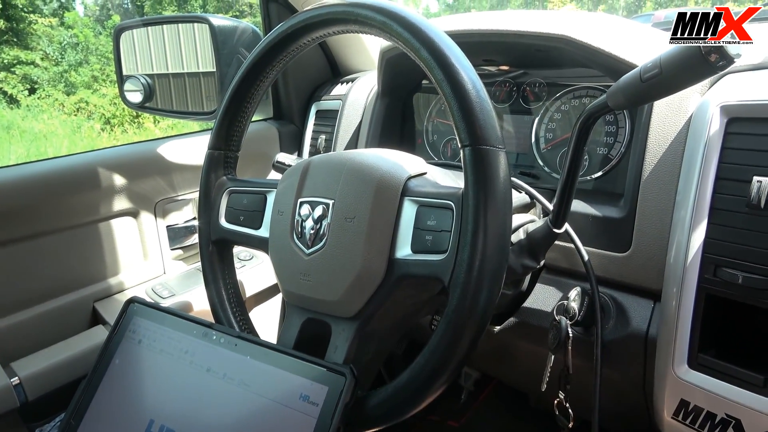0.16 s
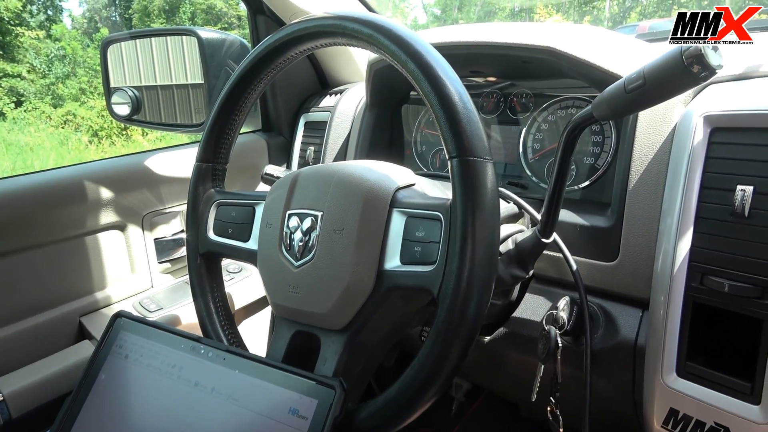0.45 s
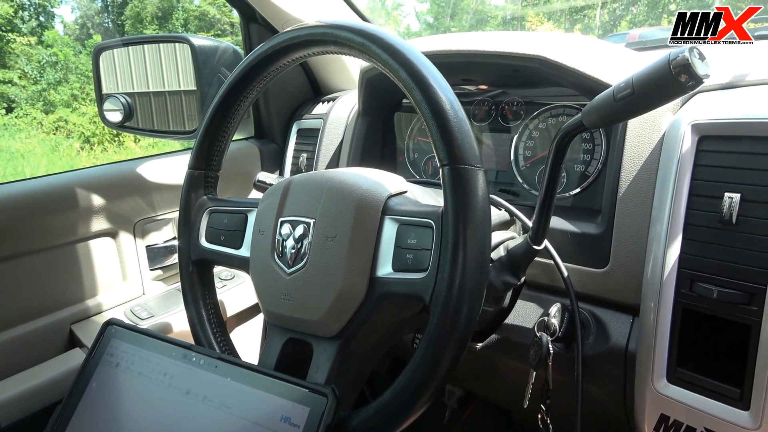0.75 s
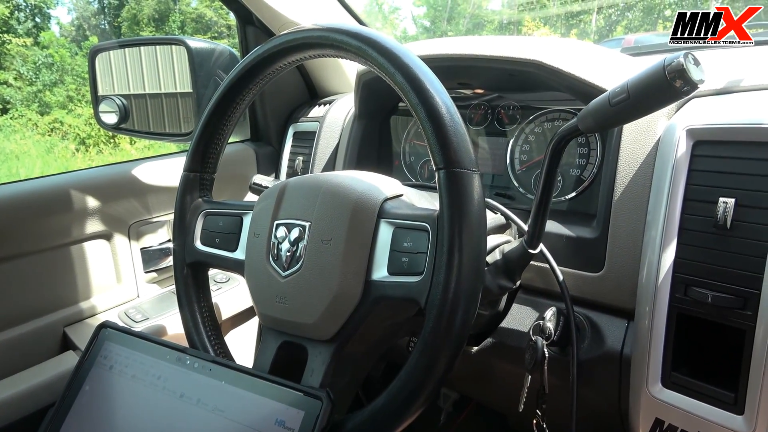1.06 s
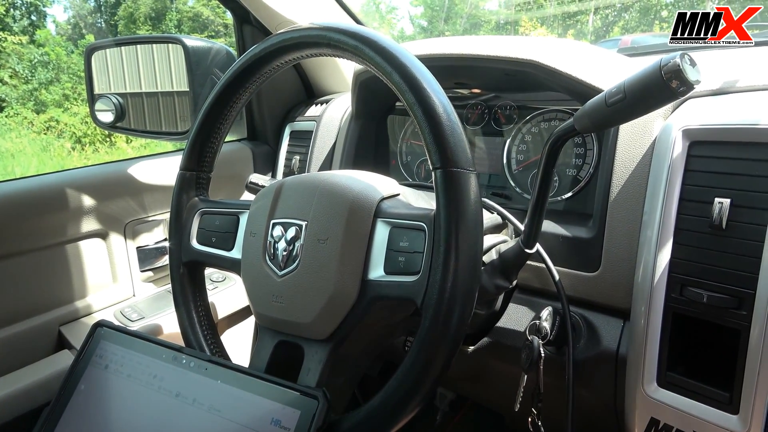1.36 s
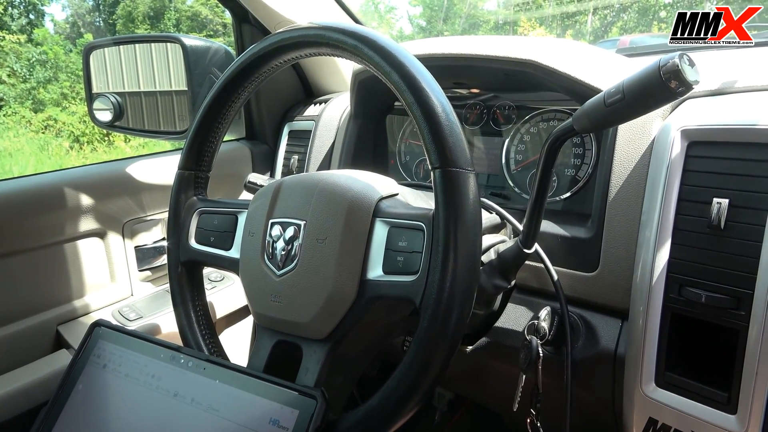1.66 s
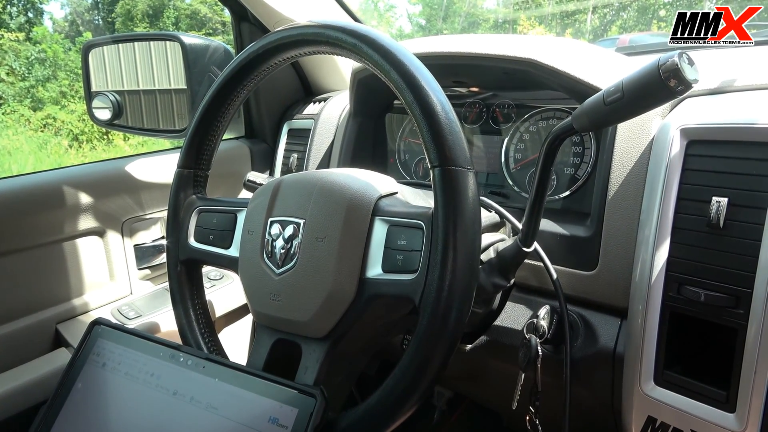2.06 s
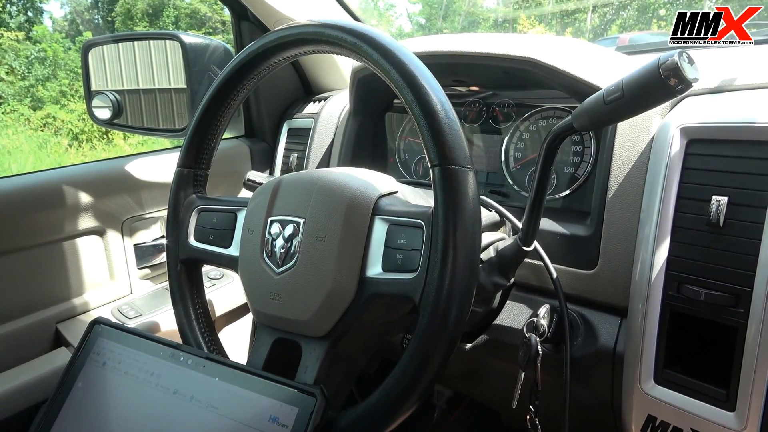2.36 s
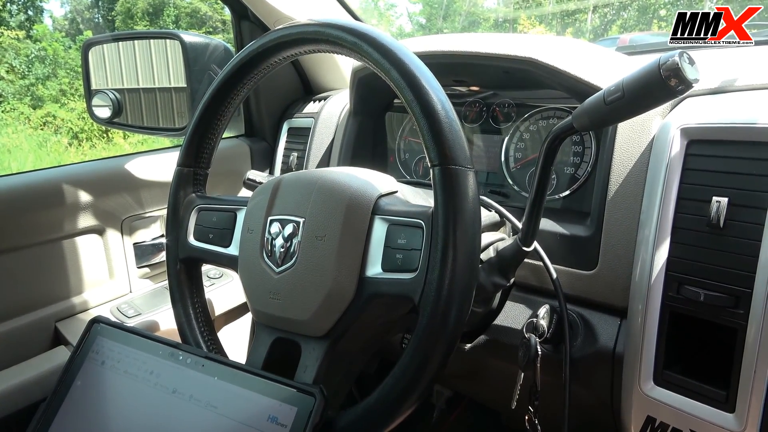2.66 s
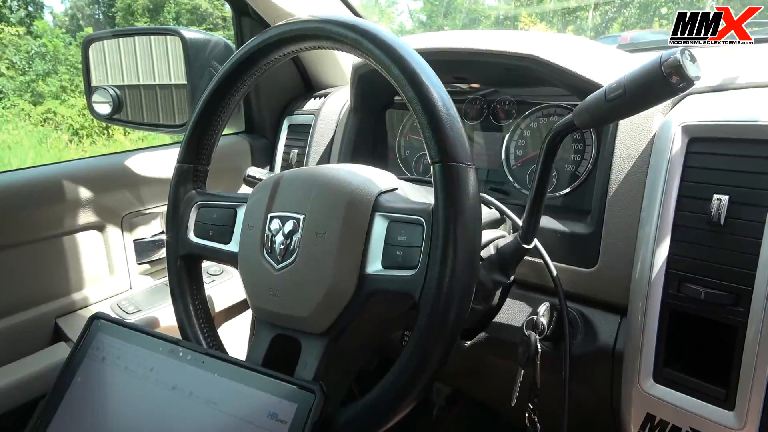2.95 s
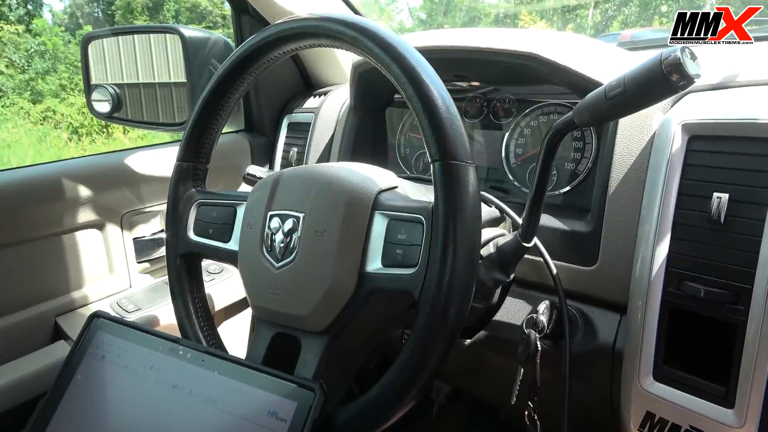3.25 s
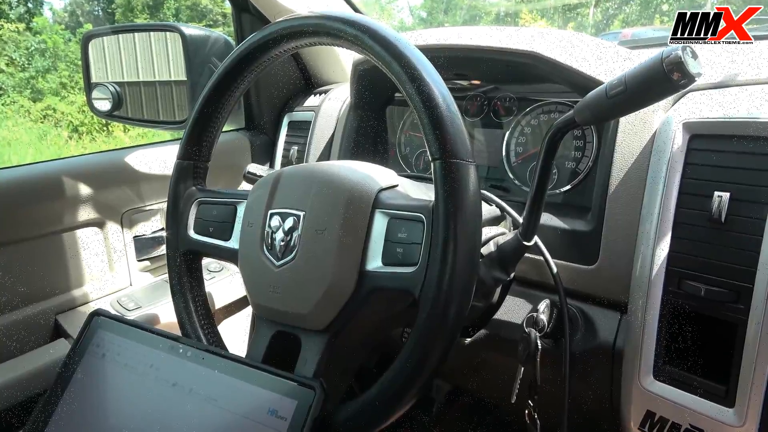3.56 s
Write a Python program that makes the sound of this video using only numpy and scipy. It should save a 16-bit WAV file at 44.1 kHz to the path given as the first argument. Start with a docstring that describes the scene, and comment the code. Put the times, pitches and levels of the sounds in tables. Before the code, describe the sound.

From inside a truck cabin, a large petrol engine idles with an uneven low rumble, slowing slightly. Its belt chirps faintly in short runs. Halfway through comes one close metallic click and a light scrape, then a soft whine swells.

```python
"""Inside a truck's cabin, a big petrol V8 settles into its idle just after starting. Its two banks fire
unevenly, making a loping boom over the rumble of uneven burning. Mechanical clatter, accessory whine and intake
hiss come through the bulkhead, and a worn spot on the drive belt chirps as it goes round, once with a broad
scuff. Once, something small and metallic clicks close by."""
import sys
import numpy as np
from scipy import signal
from scipy.fft import rfft, irfft
from scipy.io import wavfile

SR = 44100
rng = np.random.default_rng(int(sys.argv[2]) if len(sys.argv) > 2 else 0)


def materialize(psi):
    """Save the field psi as 16-bit PCM at rate SR to the path in sys.argv[1].

    A 1-D psi becomes a single channel; in a 2-D psi each row is a channel.
    """
    bounded = np.clip(np.atleast_2d(psi).T, -1, 1)
    quanta = np.round(bounded * 32767).astype(np.int16)
    wavfile.write(sys.argv[1], SR, quanta)


N = 163170
T = np.arange(N) / SR

# the idle easing down: time_s, speed_rpm
ENGINE_SPEED = [(0.0, 1141.8), (0.28, 1151.8), (0.6, 1119.3), (1.2, 1118.0), (1.9, 1114.7), (2.3, 1105.8),
                (2.7, 1106.4), (3.2, 1094.9), (3.7, 1067.9)]
# the cylinders in firing order: on_far_bank (1 or 0)
FIRING_BANKS = [0, 1, 1, 0, 1, 0, 0, 1]
# the tones of the boom: cycle_multiple, early_db, load_drop_db, settled_db
EXHAUST_TONES = [(2, -44, -46, -35), (3, -21.5, -21.5, -21.5), (5, -14.5, -15, -16.5), (7, -45, -40.5, -26),
                 (8, -18.5, -24.5, -20.5), (10, -41, -32.5, -34), (11, -40, -51, -50),
                 (14, -42, -56, -34.5), (15, -38, -60, -45), (16, -21.5, -24, -22), (17, -35.5, -32, -33),
                 (18, -44, -46, -35), (19, -41, -54, -35.5), (22, -44.5, -46, -44), (24, -43.5, -52, -59.5),
                 (29, -44, -45.5, -46.5), (31, -51, -52, -46), (35, -57, -52, -45), (48, -51.5, -49, -59.5),
                 (54, -47.5, -49, -52), (64.43, -59, -47.5, -54)]
# when the boom reaches those three stages: time_s
EXHAUST_STAGES = [0.26, 0.96, 2.4]
# colour of the combustion rumble: frequency_hz, relative_db
RUMBLE_SPECTRUM = [(5, -28), (12, -2), (22, -4), (45, -5), (80, -4.5), (105, -10.5), (125, -14.5),
                   (170, -7.5), (200, -21.5), (300, -48), (600, -80)]
# colour of the clatter through the bulkhead: frequency_hz, relative_db
CLATTER_SPECTRUM = [(120, -18), (200, -0.5), (290, -2), (400, -2.5), (510, -6), (560, -7.5), (690, -11.5),
                    (780, -3.5), (900, -7), (1060, -9.5), (1180, -8.5), (1420, -16), (1820, -10),
                    (2300, -15), (2750, -14), (2950, -14), (3200, -17.5), (4500, -30), (9000, -55)]
# ringing engine parts: pitch_hz, width_hz, midway_level_db
ENGINE_RINGS = [(749, 24, -46), (598, 18, -50.5), (865, 8, -50.5), (893, 8, -50), (1020, 9, -52),
                (1108, 9, -48), (1135, 16, -49), (1317, 12, -57), (1895, 9, -55), (1982, 9, -53.5),
                (2120, 8, -53.5), (2175, 14, -57), (2438, 18, -56), (2598, 16, -53), (3370, 14, -62)]
# colour of the intake air: frequency_hz, relative_db
HISS_SPECTRUM = [(800, -13), (2500, -11.5), (3900, -6), (4600, -1.5), (5600, -1.3), (6400, -3), (7600, -4),
                 (8800, -5.5), (10000, -9), (12000, -13.5), (13500, -20), (15500, -25)]
# the hiss creeping up: time_s, level_db
HISS_FADE = [(0, -39.5), (.9, -39.4), (1.6, -37.5), (2.3, -37), (3, -36.4), (3.7, -35.9)]
# faint whistles in the hiss: pitch_hz, width_hz, relative_db
INTAKE_WHISTLES = [(4520, 39, -18.5), (5190, 80, -12), (5658, 29, -13.5), (5910, 80, -16.5),
                   (7780, 60, -32), (8920, 160, -17), (11639, 30, -29)]
# passes of the belt's worn spot: time_s, chirp_db, scuff_db, squeak_db
BELT_PASSES = [(.162, -40, -42, -53), (.372, -37.5, -44, -57), (.59, -38, -41, -57), (.80, -45, -56, -55),
               (1.45, -40, -42, -39.5), (1.668, -40, -43, -48), (1.885, -38, -39, -38),
               (2.10, -38.5, -36.5, -43), (2.98, -40, -42, -52), (3.195, -33.5, -39.5, -34),
               (3.415, -33, -36, -40), (3.642, -37, -40, -44)]
# the chirp, scuff and squeak of a pass: pitch_hz, width_hz, lead_s, half_length_s
BELT_SOUNDS = [(7856, 340, 0.00086, 0.012), (4694, 300, 0.043, 0.018), (2876, 37, 0.019, 0.016)]
# a dry pulley chattering more as the engine settles: time_s, level_db
PULLEY_FADE = [(0, -60), (1.8, -53.5), (2.4, -51), (2.7, -40.5), (2.95, -52), (3.45, -41), (3.7, -54)]
# the metal click and its rebounds: start_s, level_db
CLICK_HITS = [(1.8199, -15.5), (1.822, -15.5), (1.8233, -16), (1.8255, -19.5), (1.828, -23), (1.832, -24),
              (1.834, -27)]
# the ring of the metal part: pitch_hz, relative_db, t60_s
METAL_MODES = [(4650, -16, .09), (5200, 9, 0.061), (5150, -10, .025), (6100, -10, .025), (6300, -8, .025),
               (6700, -3, .03)]
# colour of the click's snap: frequency_hz, relative_db
SNAP_SPECTRUM = [(2000, -35), (4000, -13), (5000, -1), (6000, 6), (7500, -14), (11000, -9), (15500, -17)]
# the accessory whine swelling and easing: time_s, level_db
WHINE_FADE = [(0, -50), (1.8, -54), (2.3, -38), (2.9, -37), (3.2, -45.5), (3.7, -44)]
# two whistling tones in the engine bay: pitch_hz, midway_level_db
BAY_TONES = [(749, -45.5), (1135, -49)]

WAVER_DB, WAVER_HZ = .94, 6  # slow unsteadiness of the engine's layers
RING_RISE_DB, TURN_PEAK_CYCLES = 4.5, .33  # shared by the ringing parts and the bay tones


def exhaust(crank, far_strength=.7, far_lag_cycles=.016):
    """Eight firings a cycle, split unevenly between two banks, boom as a loping stack of tones."""
    far = np.array(FIRING_BANKS)
    firing_cycles = np.arange(len(far)) / len(far) + far_lag_cycles * far
    strength = np.where(far, far_strength, 1)
    out = np.zeros(N)
    for multiple, *stage_db in EXHAUST_TONES:
        order = round(multiple)
        # the firing pattern sets each tone's phase
        phase = np.angle(np.sum(strength * np.exp(-2j * np.pi * order * firing_cycles)))
        level = amp(np.interp(T, EXHAUST_STAGES, stage_db) + WAVER_DB * drift(WAVER_HZ))
        if order == len(far):  # the lope: the firing tone swells and sags once a cycle
            level *= throb(crank, depth=.55, per_cycle=1, peak_cycles=.86)
        out += level * np.sqrt(2) * np.sin(2 * np.pi * order * crank + phase)
    return out


def rumble(crank, midway_db=-26.5):
    """No two firings burn alike: each pushes out a puff of low noise."""
    puffs = rng.standard_normal(N) * throb(crank, depth=.5, per_cycle=8)
    return amp(midway_db) * rising(rise_db=8) * unit(colour(puffs, RUMBLE_SPECTRUM))


def clatter(crank, midway_db=-33, repeat_share=.39, valve_depth=.068, split_hz=1300):
    """Moving parts rattle and ring, partly alike in every cycle, pulsing with crank and valves."""
    pattern = rng.standard_normal(int(N / (crank[-1] - crank[0])))  # one cycle long
    repeating = pattern[(crank % 1 * len(pattern)).astype(int)]
    rattle = np.sqrt(repeat_share) * repeating + np.sqrt(1 - repeat_share) * rng.standard_normal(N)
    rattle *= throb(crank, valve_depth, per_cycle=16) * throb(crank, valve_depth, per_cycle=8)
    muffled = amp(midway_db) * rising(rise_db=3.5) * unit(colour(rattle, CLATTER_SPECTRUM))
    body = signal.sosfiltfilt(signal.butter(2, split_hz, fs=SR, output="sos"), muffled)
    top = muffled - body
    rings = rising(RING_RISE_DB) * sum(amp(db) * band(hz, width) for hz, width, db in ENGINE_RINGS)
    each_turn = throb(crank, depth=.19, per_cycle=2, peak_cycles=TURN_PEAK_CYCLES)
    each_cycle = throb(crank, depth=.15, per_cycle=1, peak_cycles=.35)
    return (body + rings) * each_turn + top * each_cycle


def intake(flutter_db=.94, flutter_hz=42.7):
    """Air hisses and faintly whistles past the nearly closed throttle, with a slight flutter."""
    hiss = unit(colour(rng.standard_normal(N), HISS_SPECTRUM))
    whistles = sum(amp(db) * band(hz, width) for hz, width, db in INTAKE_WHISTLES)
    return amp(curve(HISS_FADE) + flutter_db * drift(flutter_hz)) * (hiss + whistles)


def belt(chatter_db=3.5, chatter_hz=22):
    """Each pass of the worn spot scuffs, squeaks and chirps, over the chatter of a dry pulley."""
    pulley_level = amp(curve(PULLEY_FADE) + chatter_db * drift(chatter_hz))
    out = pulley_level * band(hz=2902, width_hz=78)
    for voice, (hz, width_hz, lead_s, half_s) in enumerate(BELT_SOUNDS):
        passes = sum(amp(db[voice]) * swell(time_s - lead_s, half_s) for time_s, *db in BELT_PASSES)
        out += passes * band(hz, width_hz)
    return out


def click(snap_decay_s=.0012, ring_db=-14.5):
    """A small metal part snaps, rebounds and rings briefly."""
    noise = unit(colour(rng.standard_normal(N), SNAP_SPECTRUM))
    out = np.zeros(N)
    for start_s, level_db in CLICK_HITS:
        start = round(start_s * SR)
        span = slice(start, start + SR // 10)
        t = T[span] - T[start]
        snap = noise[span] * np.exp(-t / snap_decay_s)
        ring = sum(amp(db - 60 * t / t60_s) * np.sin(2 * np.pi * (hz * t + rng.random()))
                   for hz, db, t60_s in METAL_MODES)
        out[span] += amp(level_db) * (snap + amp(ring_db) * ring)
    return out


def whine(crank, cycle_multiple=37):
    """An accessory sings at a pitch locked to the engine's speed."""
    level = amp(curve(WHINE_FADE) + WAVER_DB * drift(WAVER_HZ))
    return level * np.sqrt(2) * np.sin(2 * np.pi * cycle_multiple * crank)


def bay_tones(crank, wander_hz=3.48, flutter_db=2.5, flutter_hz=14):
    """Two tones from the engine bay pulse once a turn, but keep their pitch as the engine slows."""
    out = np.zeros(N)
    for hz, db in BAY_TONES:
        phase = 2 * np.pi * np.cumsum(hz + wander_hz * drift(WAVER_HZ)) / SR
        out += amp(db + flutter_db * drift(flutter_hz)) * np.sqrt(2) * np.sin(phase)
    each_turn = throb(crank, depth=.4, per_cycle=2, peak_cycles=TURN_PEAK_CYCLES)
    return out * rising(RING_RISE_DB) * each_turn


def scrape(level_db=-37.5):
    """Once, the belt's worn spot scuffs broadly, just before its pass at 2.1 s."""
    return amp(level_db) * swell(peak_s=2.045, half_s=.033) * band(hz=4480, width_hz=1700)


def amp(db):
    """Decibels to gain."""
    return 10 ** (np.asarray(db) / 20)


def unit(x):
    """Scales to rms 1."""
    return x / np.sqrt(np.mean(x ** 2) + 1e-20)


def curve(points):
    """Straight ramps between (time_s, value) points."""
    return np.interp(T, *np.transpose(points))


def colour(x, points):
    """An EQ drawn through (frequency_hz, gain_db) points."""
    hz, db = np.transpose(points)
    f = np.fft.rfftfreq(N, 1 / SR)
    gain = amp(np.interp(np.log(f + 1), np.log(hz), db))
    return irfft(rfft(x) * gain, N)


def band(hz, width_hz):
    """Noise in one steep resonance, rms 1."""
    f = np.fft.rfftfreq(N, 1 / SR)
    resonance = 1 / (1 + (1.19 * (f - hz) / width_hz) ** 2)
    return unit(irfft(rfft(rng.standard_normal(N)) * resonance, N))


def drift(rate_hz):
    """Slow random wander, rms 1."""
    f = np.fft.rfftfreq(N, 1 / SR)
    lowpass = (f > 0) * np.exp(-(f / rate_hz) ** 2)
    return unit(irfft(rfft(rng.standard_normal(N)) * lowpass, N))


def rising(rise_db):
    """A steady fade up across the scene, at unity gain midway."""
    return amp(rise_db * (T / T[-1] - .5))


def throb(crank, depth, per_cycle, peak_cycles=0):
    """A tremolo locked to the engine cycle."""
    return 1 + depth * np.cos(2 * np.pi * per_cycle * (crank - peak_cycles))


def swell(peak_s, half_s):
    """A smooth rise and fall around a moment."""
    return np.exp(-.5 * ((T - peak_s) / half_s) ** 2)


def scene(start_cycles=.786, jitter_cycles=.002):
    """The mono mix; the crank angle, counted in two-turn cycles, gives the engine its pulse."""
    crank = start_cycles + np.cumsum(curve(ENGINE_SPEED)) / (120 * SR)
    crank += jitter_cycles * drift(WAVER_HZ)
    engine = exhaust(crank) + rumble(crank) + whine(crank) + clatter(crank) + intake() + belt()
    return (engine + click() + scrape() + bay_tones(crank))[None]


def record(dry):
    """A steep low-pass trims the very top of the treble."""
    cutoff_hz = 15700
    lowpass = signal.firwin(511, cutoff_hz, window=("kaiser", 9), fs=SR)
    return signal.oaconvolve(dry, lowpass[None], "same")


dry = scene()
out = record(dry)
materialize(out)
```